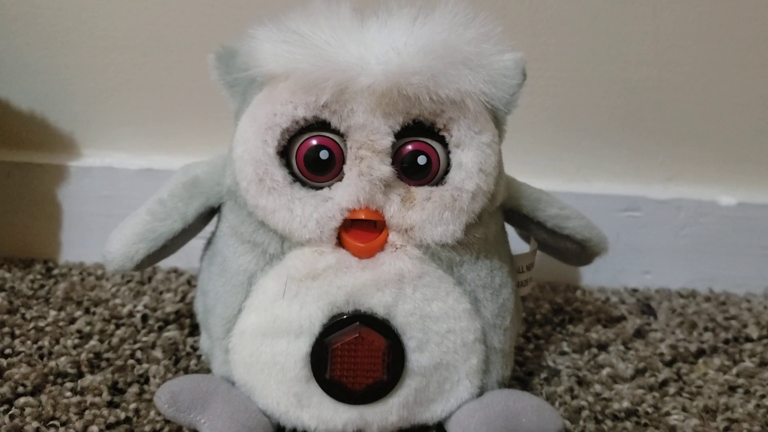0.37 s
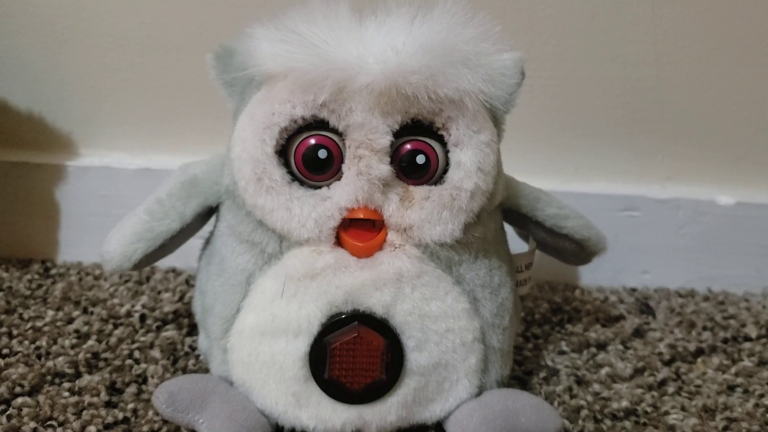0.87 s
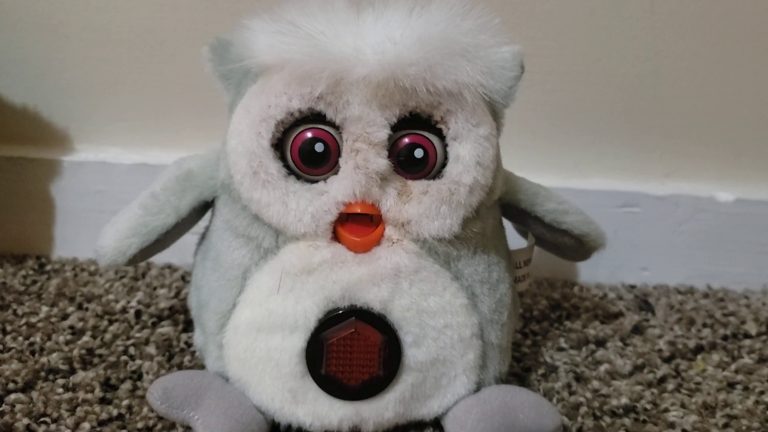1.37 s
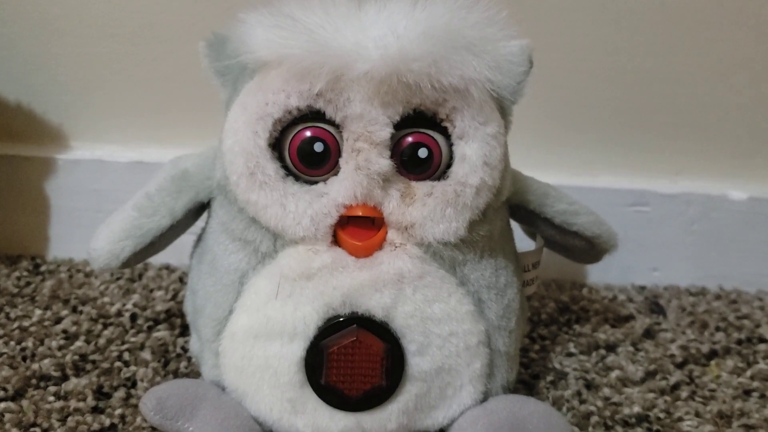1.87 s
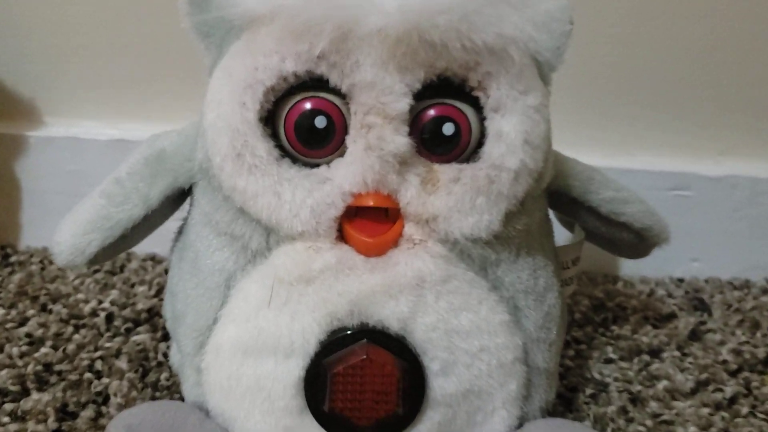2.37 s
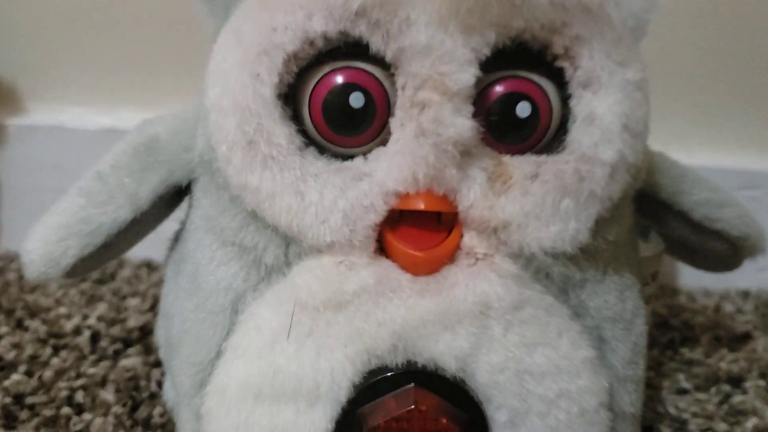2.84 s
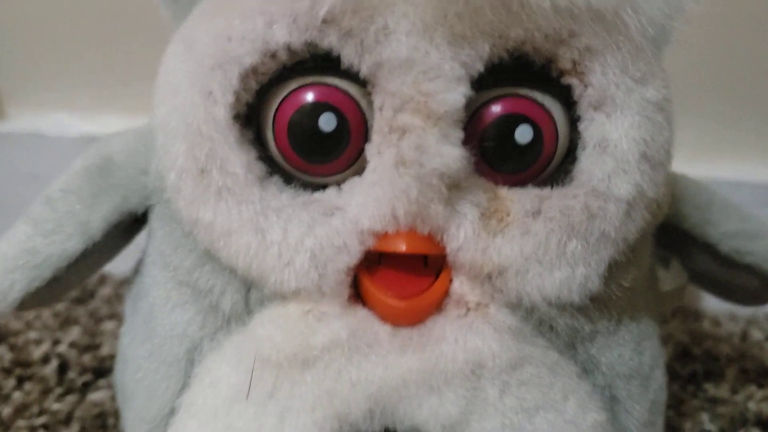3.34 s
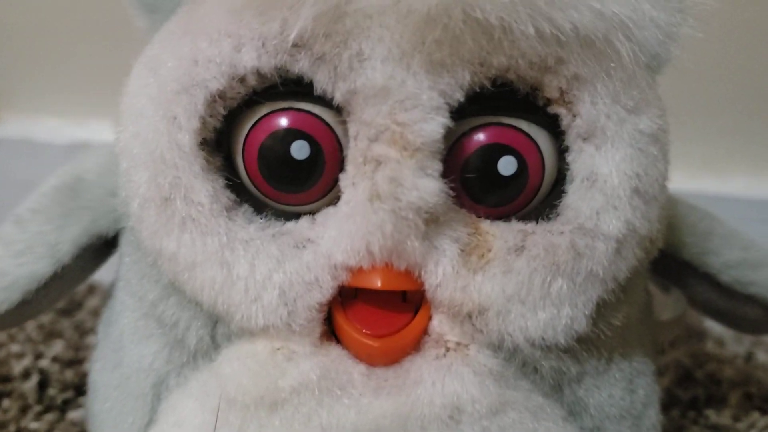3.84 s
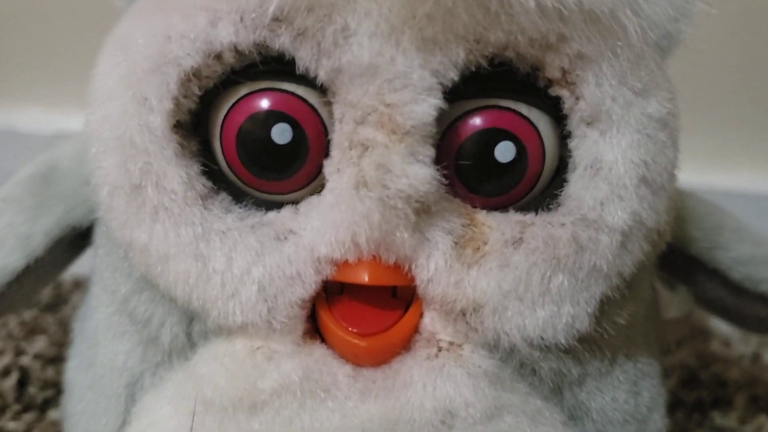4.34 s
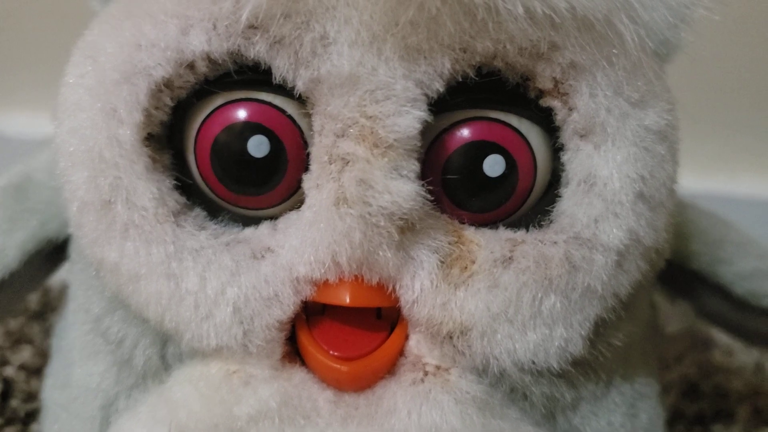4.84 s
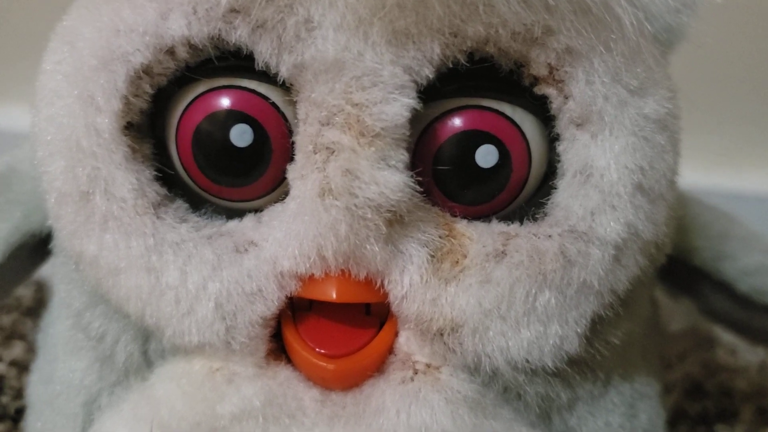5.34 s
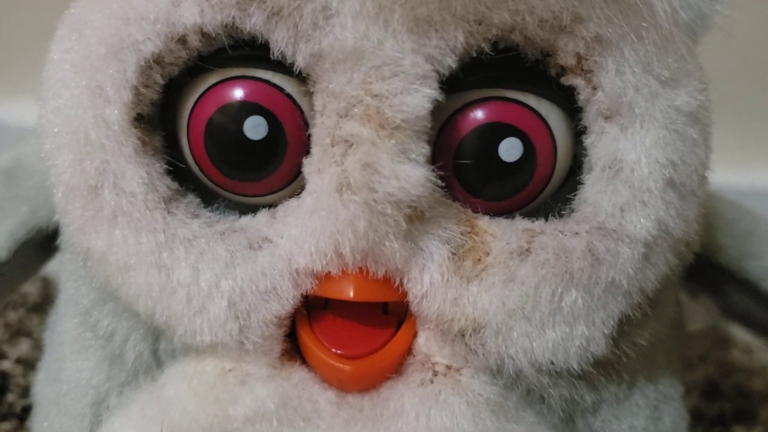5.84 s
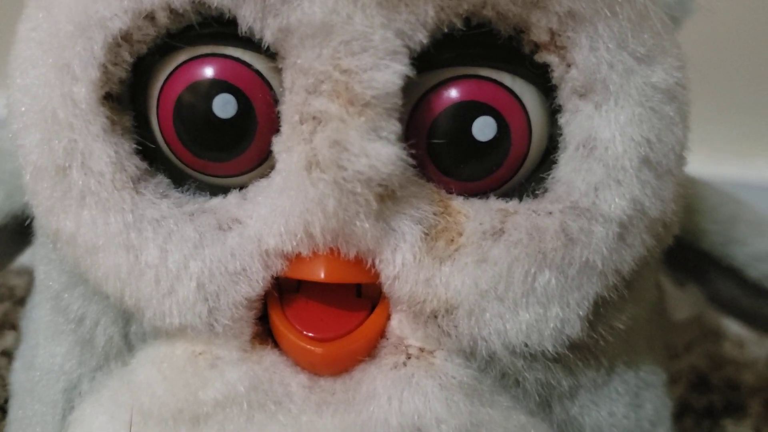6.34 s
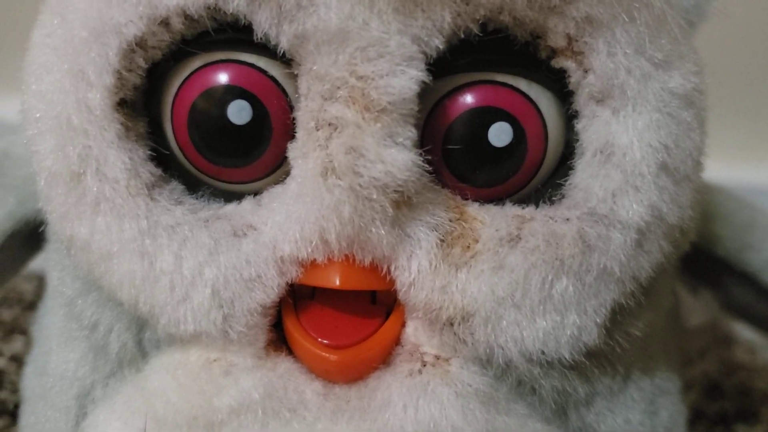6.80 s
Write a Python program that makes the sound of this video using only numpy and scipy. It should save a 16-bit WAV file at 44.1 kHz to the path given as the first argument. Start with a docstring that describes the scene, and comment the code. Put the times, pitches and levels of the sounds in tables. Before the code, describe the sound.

A steady low air conditioner hum with soft rumble and rushing air in a quiet carpeted room, with a few faint bright brushing swishes early on.

```python
"""Sharp motor and mains tones are heard first: an air conditioner runs steadily across a quiet carpeted room.
The tones are slowly wavering sines; the rumble and rushing air beneath are noise shaped by the room's peaks.
Each compressor stroke gates noise through casing resonances, a faint rattle; soft brushes are brief bright
noise, and a thin hiss is unrelated noise at the two ports. A hand-held stereo microphone low by a wall
creeps forward, so the levels of tones, peaks and hiss shift."""
import sys
import numpy as np
from scipy import signal
from scipy.fft import rfft, irfft, next_fast_len
from scipy.io import wavfile
from scipy.ndimage import uniform_filter1d, map_coordinates

SR = 44100
rng = np.random.default_rng(int(sys.argv[2]) if len(sys.argv) > 2 else 0)


def boost_factor(decibels):
    """Convert a level in decibels to a linear amplitude factor."""
    exponent = np.asarray(decibels, float) / 20
    return 10 ** exponent


def dump_mix(stems):
    """Bounce the given channels to the path in sys.argv[1] as a 16-bit WAV at rate SR."""
    frames = np.atleast_2d(stems).T  # one column per channel
    limited = np.clip(frames, -1, 1)  # hard clip at full scale
    pcm = np.round(limited * 32767).astype(np.int16)
    wavfile.write(sys.argv[1], SR, pcm)


N = 317079

SHAFT_HZ = 7.1309
STROKES_PER_TURN = 8  # compressor strokes in one shaft turn
STROKE_HZ = STROKES_PER_TURN * SHAFT_HZ
SIDE_STEP = 3  # side tones lie this many shaft multiples above a stroke tone
# side tones relative to stroke tones at the two positions; random spread of all weak tones by standing waves
SIDE_FIRST_DB, SIDE_LAST_DB, SCATTER_DB = -8, -3, 4
RUMBLE_FIRST_DB, RUMBLE_LAST_DB = -0.5, 0.5  # gain on the fan rumble
RATTLE_DB, RATTLE_SWELL_DB, RATTLE_PEAK_S, RATTLE_SWELL_S = -1, 2.5, 2.05, 0.44  # gain, with one swell
TOP_HZ = 15720

# Strongest motor tones, mean rms: [multiple of shaft rate, first left level/dB, first right level/dB,
# last left level/dB, last right level/dB]
MOTOR_TONES = [(8, -39, -40, -39, -40), (24, -50, -49, -48, -47), (32, -52, -52, -50, -50),
               (40, -70, -65, -62, -62), (48, -70, -65, -65, -60), (64, -72, -74, -73, -76),
               (72, -69, -75, -69, -71), (96, -73, -84, -71, -80), (128, -69, -73, -69, -72),
               (136, -70, -78, -70, -88), (152, -77, -70, -68, -72), (176, -75, -84, -86, -67),
               (227, -86, -81, -75, -71), (320, -80, -82, -92, -82)]
# Mean level of the weaker stroke tones before scatter: [f/Hz, rms level/dB]
FAINT_LEVELS = [(400, -78), (650, -81), (900, -75), (1500, -78), (2300, -86)]
# Tones not locked to the motor: [f/Hz, mean rms level/dB, waver/dB]
DRONE_TONES = [(36.3, -66, 2), (43.67, -56, 1.5), (83.73, -58, 1.5), (85.71, -45, 1.2), (120.03, -50, .3),
               (138.18, -64, 1.5)]
# Fan rumble spectrum before gain and ripple: [f/Hz, level/dB per Hz]
RUMBLE_SPECTRUM = [(15, -86), (30, -82), (45, -65.5), (65, -69.5), (105, -66.5), (118, -75.5), (135, -74.5),
                   (175, -72.5), (197, -76), (290, -76.5), (365, -82.5), (520, -97.5), (700, -105),
                   (1000, -120)]
# Rushing air spectrum before drift and ripple: [f/Hz, level/dB per Hz]
AIR_SPECTRUM = [(250, -120), (450, -91), (620, -91.5), (720, -87), (1000, -85.5), (1300, -87), (1500, -87),
                (2250, -90), (3300, -93.5), (4300, -96), (6200, -98), (7200, -101.5), (8500, -112),
                (11000, -120)]
# Room peaks before drive and ripple: [f/Hz, width at -6 dB/Hz, first level/dB per Hz, last level/dB per Hz]
ROOM_PEAKS = [(89, 12.5, -69, -60.5), (214, 14, -67, -61.5), (235.2, 13.2, -69, -66),
              (265.7, 12.4, -83.5, -71.5), (332.3, 28, -78, -74), (432, 118, -79.5, -94.5),
              (870, 57, -86.5, -96), (968, 44, -88, -88), (1130, 100, -92, -87), (1250, 49, -90, -82.5),
              (4800, 360, -100, -100)]
# Casing peaks before gain and ripple: [f/Hz, width at -6 dB/Hz, first level/dB per Hz, last level/dB per Hz]
CASING_PEAKS = [(1604, 120, -100, -85.5), (2010, 250, -92, -101), (2290, 160, -94, -96.5),
                (2522, 110, -86.5, -87.5), (2650, 78, -100, -102), (2976, 185, -86.5, -90),
                (3080, 110, -93, -103), (6360, 700, -104, -104)]
# Soft brushes, rms at the peak: [peak t/s, rise t/s, fall t/s, left level/dB, right level/dB]
BRUSH_STROKES = [(1.235, .022, .014, -90, -53.5), (1.35, .02, .025, -80, -66), (1.75, .15, .2, -90, -70),
                 (2.19, .1, .1, -65.5, -69), (2.5, .3, .5, -70, -80)]
# Colour of a brush: [f/Hz, relative level/dB]
BRUSH_SPECTRUM = [(3000, -35), (7000, -13), (8800, -4), (10000, -5), (12000, 0), (13500, -2), (15700, -1),
                  (16000, -120)]
# Treble hiss at the two positions: [f/Hz, first level/dB per Hz, last level/dB per Hz]
HISS_SPECTRUM = [(2000, -120, -120), (6000, -111, -111), (8300, -109.5, -110.5), (9100, -109.5, -111),
                 (10300, -111.5, -110), (11700, -107.5, -108.5), (14500, -107, -108),
                 (15700, -107.5, -108.5)]
# The microphone's way forward: [t/s, share of the way 0-1]
MICROPHONE_WAY = [(0, 0.04), (1.9, 0.1), (2.4, 0.26), (3.1, 0.55), (3.8, 0.95), (7.19, 0.93)]
# Two ports a hand apart, the machine to the left:
# [f/Hz, likeness 0-1, left lead/rad, left-right level/dB]
PORT_RELATIONS = [(50, 0.97, 0.17, 2.5), (100, 0.95, 0, 0), (248, .97, 0.12, 0), (340, 0.92, -0.74, -2.5),
                  (417, 0.2, 0.5, 4), (690, 0.78, 0.72, 3.5), (1096, 0.6, 1.74, 1), (1400, 0.71, 2.5, 1),
                  (2310, 0.34, 4.5, 2), (2850, 0.45, 6, 2.5), (3680, 0, 8, 3), (4210, 0.46, 9, 2.5),
                  (6360, 0.34, 14, 12), (8400, 0.2, 18, 2)]


def along(rows, hz, column=1):
    """Logarithmic frequency scale: read one column of a spectrum by interpolation on it."""
    columns = np.transpose(rows)
    return np.interp(np.log(hz + 1), np.log(columns[0] + 1), columns[column])


def wobble(rate):
    """Slow random modulation: a smooth curve through normal deviates, rate knots a second."""
    knots = rng.standard_normal(int(N * rate / SR) + 4)
    return map_coordinates(knots, [np.arange(N) * rate / SR])


def filtered(x, response):
    """Linear filtering: multiply the spectrum by a complex response of frequency."""
    m = next_fast_len(N + 8192)
    return irfft(rfft(x, m) * response(np.fft.rfftfreq(m, 1 / SR)), m)[..., :N]


def noise(patchy_db):
    """White noise: two unrelated signals of 0 dB per Hz under one shared random time-frequency gain."""
    spectrum = signal.stft(rng.standard_normal((2, N + 512)), nperseg=512)[2]
    field = rng.standard_normal(spectrum.shape[1:])
    field = uniform_filter1d(field, size=5, axis=0)  # over frequency
    field = uniform_filter1d(field, size=16, axis=1)  # over time
    patchy = spectrum * boost_factor(patchy_db * field / field.std())
    return np.sqrt(SR / 2) * signal.istft(patchy, nperseg=512)[1][:, :N]


def at_ports(pair, gain):
    """Spatial coherence: mix two unrelated noises to the likeness, lead and level difference of the ports."""
    def common_and_opposed(hz):
        angle = np.arccos(np.clip(along(PORT_RELATIONS, hz), 0, 1)) / 2
        return gain(hz) * np.array([np.cos(angle), np.sin(angle)])

    def lead_and_level(hz):
        ratio = boost_factor(along(PORT_RELATIONS, hz, column=3) / 2)
        tilt = ratio * np.exp(.5j * along(PORT_RELATIONS, hz, column=2))
        # the divisor keeps the mean power of the two ports
        return np.array([tilt, 1 / tilt]) / np.sqrt(np.cosh(2 * np.log(ratio)))

    common, opposed = filtered(pair, common_and_opposed)
    return filtered(np.array([common + opposed, common - opposed]), lead_and_level)


def resonant(table, way, drive, patchy_db):
    """Resonance: driven noise through squared Lorentzian peaks, crossfaded in power between positions."""
    def peaks(hz, column):
        power = sum(boost_factor(2 * row[column]) / (1 + (2 * (hz - row[0]) / row[1]) ** 2) ** 2 for row in table)
        return np.sqrt(power)

    first = at_ports(drive * noise(patchy_db), lambda hz: peaks(hz, column=2))
    last = at_ports(drive * noise(patchy_db), lambda hz: peaks(hz, column=3))
    return np.sqrt(1 - way) * first + np.sqrt(way) * last


def ripple(depth_db, spacing_hz):
    """Standing waves: a fixed random comb over frequency, its own at each port, fading out in the bass."""
    knots = rng.standard_normal((2, int(SR / 2 / spacing_hz) + 4))

    def response(hz):
        comb = np.array([map_coordinates(k, [hz / spacing_hz]) for k in knots])
        return boost_factor(depth_db * np.clip(hz / 900, 0, 1) * comb)
    return response


def tone(hz, ports_db, waver_db, waver_rate, lead=1):
    """Pure tone: a sine with an interaural-like phase lead, its level drifting partly apart at the ports."""
    phase = 2 * np.pi * (hz * np.arange(N) / SR + rng.random())
    side = np.array([[.5], [-.5]])
    drift_db = waver_db * (wobble(waver_rate) + side * min(hz / 600, 1) * wobble(waver_rate))
    port_phase = phase + side * lead * along(PORT_RELATIONS, hz, column=2)
    return np.sqrt(2) * boost_factor(ports_db + drift_db) * np.sin(port_phase)


def faint_tones():
    """Harmonic series: weaker stroke multiples, and a side tone above every other stroke multiple."""
    strong = [row[0] for row in MOTOR_TONES]
    per_turn = STROKES_PER_TURN
    strokes = range(7 * per_turn, 40 * per_turn, per_turn)
    sides = range(12 * per_turn + SIDE_STEP, 46 * per_turn, 2 * per_turn)
    multiples = np.array([k for k in [*strokes, *sides] if k not in strong])
    is_side = multiples % per_turn > 0
    under_db = np.outer(is_side, np.repeat([SIDE_FIRST_DB, SIDE_LAST_DB], 2))
    scatter_db = SCATTER_DB * rng.standard_normal(under_db.shape)
    levels = along(FAINT_LEVELS, multiples * SHAFT_HZ)[:, None] + under_db + scatter_db
    return [(k, *row) for k, row in zip(multiples, levels)]


def hum(way):
    """Superposition of tones: short waves waver more as the microphone sways; drones keep their mean level."""
    total = 0
    for k, *levels in MOTOR_TONES + faint_tones():
        ports_db = np.outer(levels[:2], 1 - way) + np.outer(levels[2:], way)
        lead = .4 if k % STROKES_PER_TURN else 1  # side tones arrive from nearer the middle
        waver_db = min(0.14 + 0.012 * k, 1.6)
        total = total + tone(k * SHAFT_HZ, ports_db, waver_db, waver_rate=0.88, lead=lead)
    for hz, level_db, waver_db in DRONE_TONES:
        total = total + tone(hz, level_db, waver_db, waver_rate=1.59)
    return total


def airflow(way):
    """Broadband flow noise: the fan's rumble and rush, reinforced at the room's peaks."""
    rumble_db = RUMBLE_FIRST_DB + (RUMBLE_LAST_DB - RUMBLE_FIRST_DB) * way + 0.51 * wobble(2.4)
    rumble = at_ports(noise(patchy_db=0.5), lambda hz: boost_factor(along(RUMBLE_SPECTRUM, hz)))
    rush_db = .2 * wobble(3.8)
    rush = at_ports(noise(patchy_db=0.53), lambda hz: boost_factor(along(AIR_SPECTRUM, hz)))
    room = resonant(ROOM_PEAKS, way, drive=0.98, patchy_db=0.5)
    return boost_factor(rumble_db) * rumble + boost_factor(rush_db) * rush + room


def rattle(way):
    """Impulsive excitation: each compressor stroke drives a short noise burst through the casing."""
    t = np.arange(N) / SR
    strokes = STROKE_HZ * t + .42
    age = strokes % 1 / STROKE_HZ  # seconds since the last stroke
    size = boost_factor(.8 * rng.standard_normal(int(strokes[-1]) + 1))[strokes.astype(int)]
    burst = size * (1 - np.exp(-age / .0008)) * boost_factor(-60 * age / .055)  # decays at 60 dB in 55 ms
    drive = burst / np.sqrt(np.mean(burst ** 2))
    swell = np.exp(-.5 * ((t - RATTLE_PEAK_S) / RATTLE_SWELL_S) ** 2)
    return boost_factor(RATTLE_DB + RATTLE_SWELL_DB * swell) * resonant(CASING_PEAKS, way, drive, patchy_db=.4)


def brushes():
    """Friction noise: bright swishes under two-sided Gaussian envelopes, each louder at one port."""
    t = np.arange(N) / SR
    swish = filtered(noise(patchy_db=.8), lambda hz: boost_factor(along(BRUSH_SPECTRUM, hz)))
    envelope = 0
    for peak, rise, fall, left_db, right_db in BRUSH_STROKES:
        shape = np.exp(-.5 * ((t - peak) / np.where(t < peak, rise, fall)) ** 2)
        envelope = envelope + boost_factor(np.array([[left_db], [right_db]])) * shape
    return envelope * swish / swish.std()


def hiss(way):
    """Incoherent noise: a thin treble hiss, unrelated at the ports, its colour shifting along the way."""
    def first_and_last(hz):
        return boost_factor([along(HISS_SPECTRUM, hz, column=c) for c in (1, 2)])[:, None]

    first, last = filtered(noise(patchy_db=.3), first_and_last)
    return (1 - way) * first + way * last


def scene():
    """Superposition: all sources add at the two ports; standing waves colour the airflow and rattle."""
    times, shares = np.transpose(MICROPHONE_WAY)
    way = np.clip(np.interp(np.arange(N) / SR, times, shares), 0, 1)
    coloured = filtered(airflow(way) + rattle(way), ripple(depth_db=1.4, spacing_hz=27.87))
    return hum(way) + coloured + brushes() + hiss(way)


def band_limit(x):
    """A steep low-pass at the top of the band."""
    return signal.sosfilt(signal.butter(12, 16380, fs=SR, output="sos"), x)


def record(dry):
    """Band limitation: remove everything from TOP_HZ upwards to finish the mix."""
    mix = filtered(dry, lambda hz: hz < TOP_HZ)
    return band_limit(mix)


dry = scene()
out = record(dry)
dump_mix(out)
```